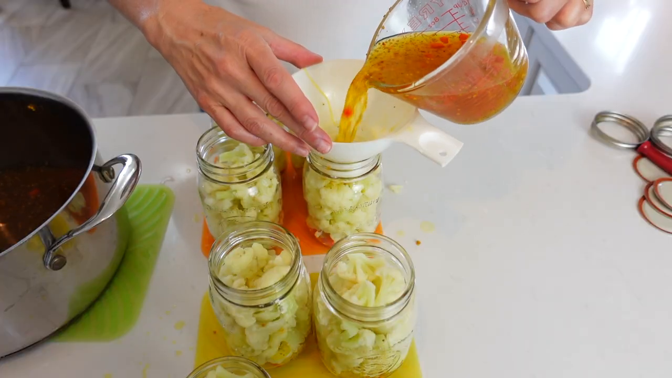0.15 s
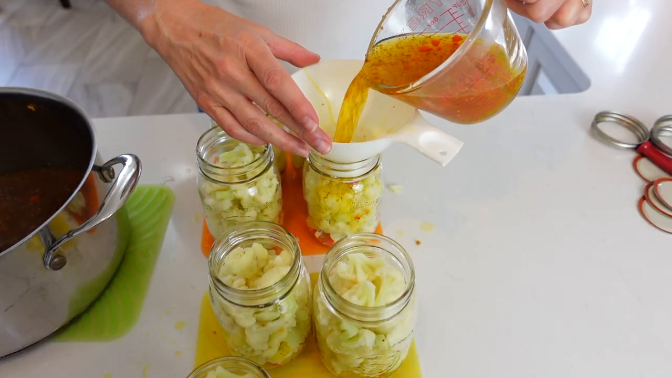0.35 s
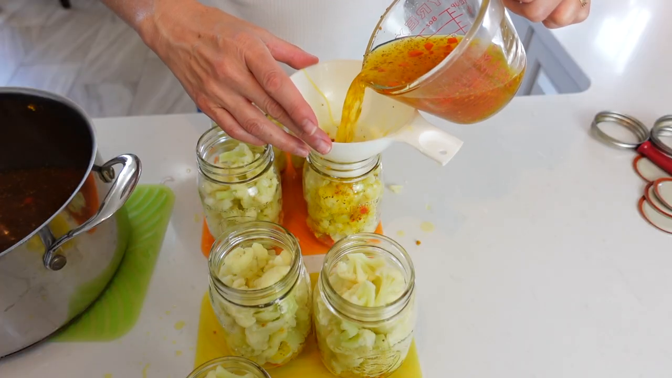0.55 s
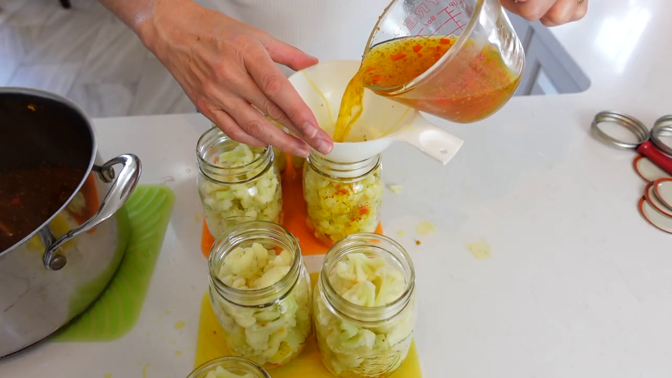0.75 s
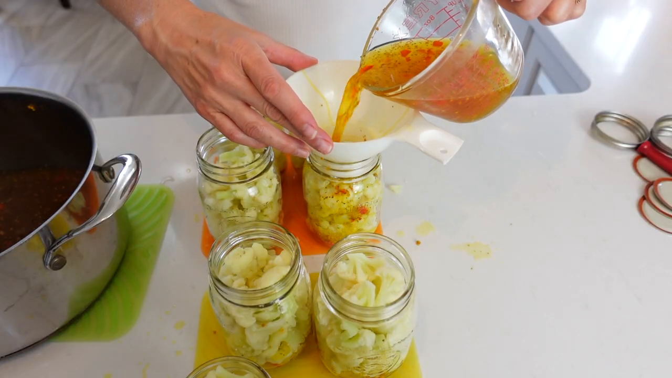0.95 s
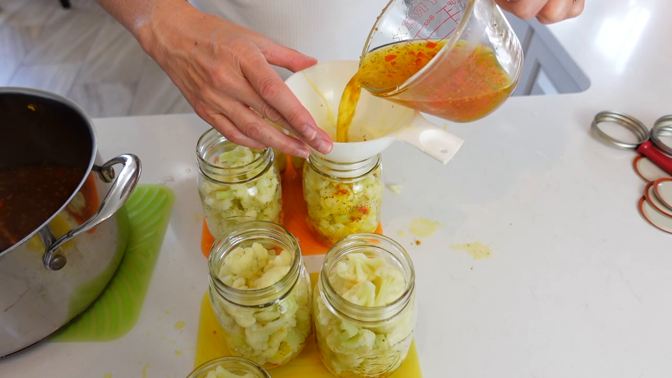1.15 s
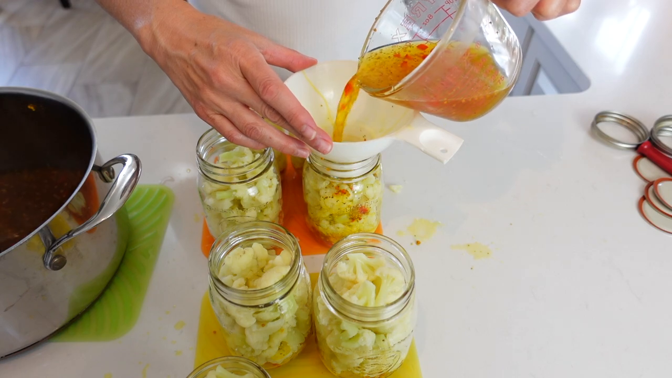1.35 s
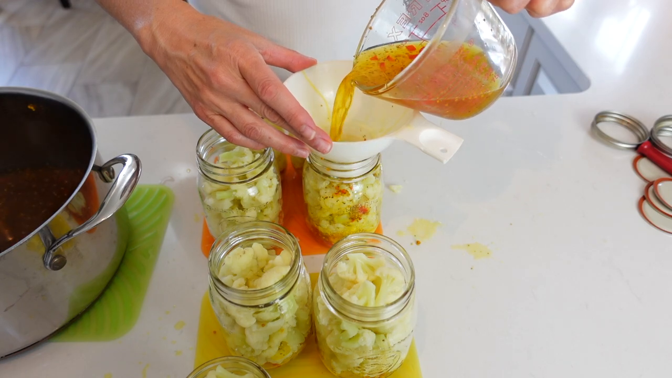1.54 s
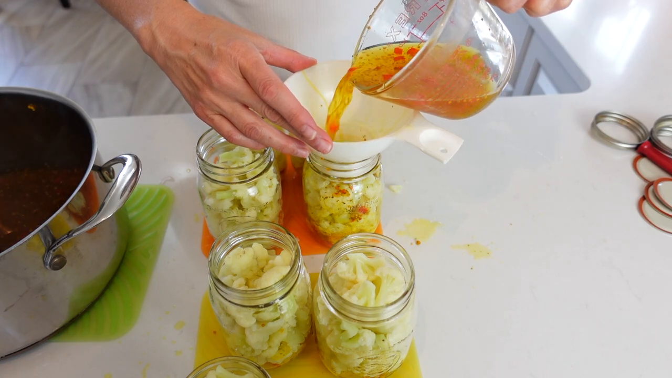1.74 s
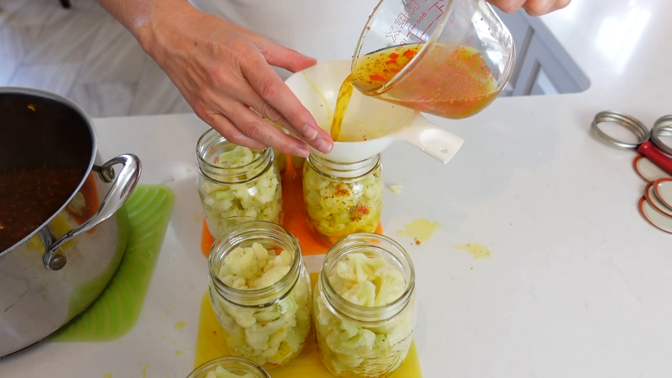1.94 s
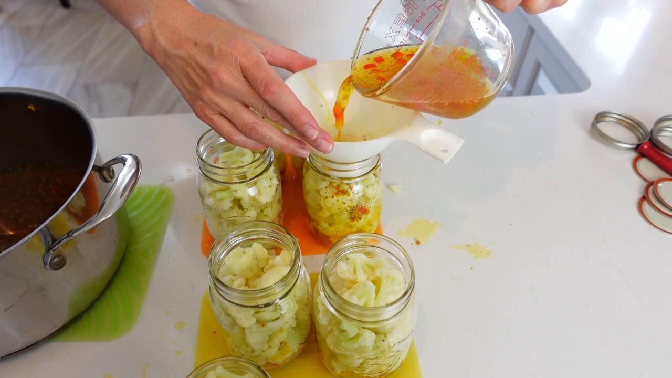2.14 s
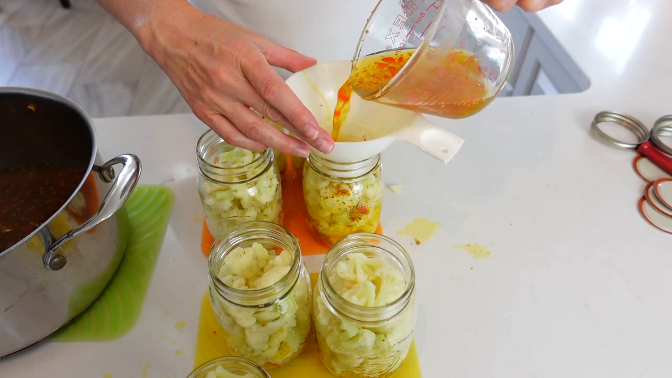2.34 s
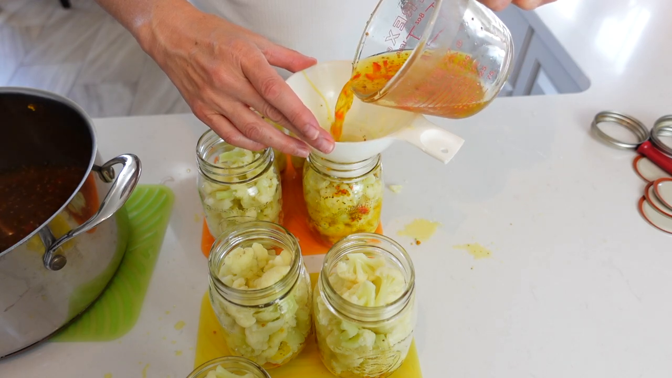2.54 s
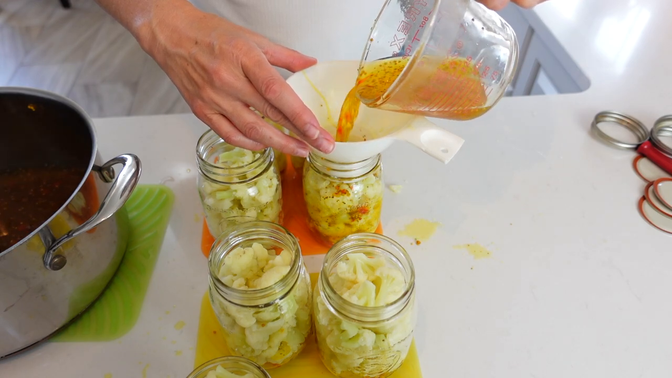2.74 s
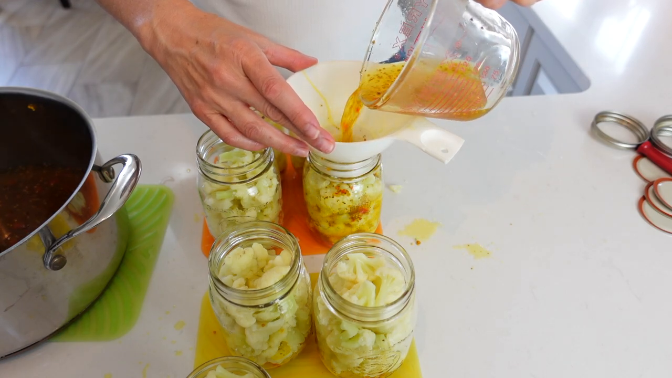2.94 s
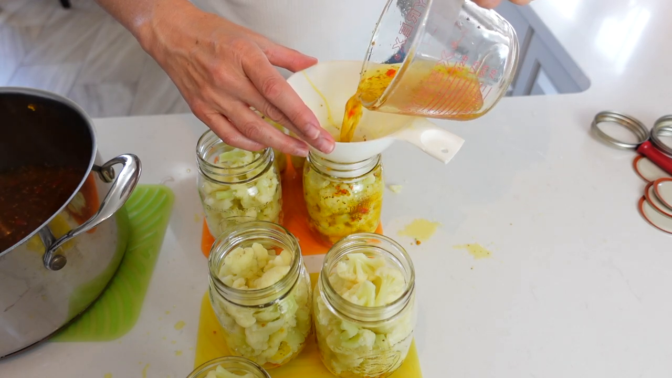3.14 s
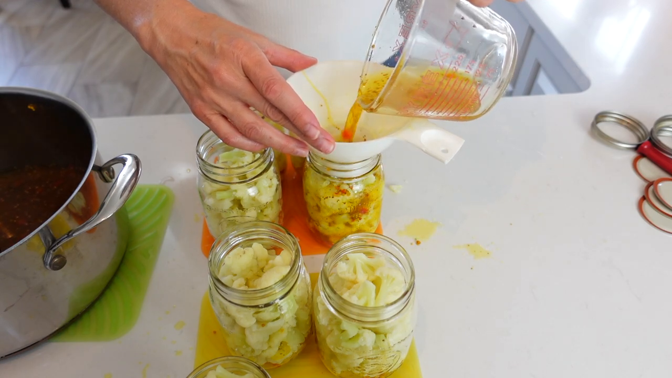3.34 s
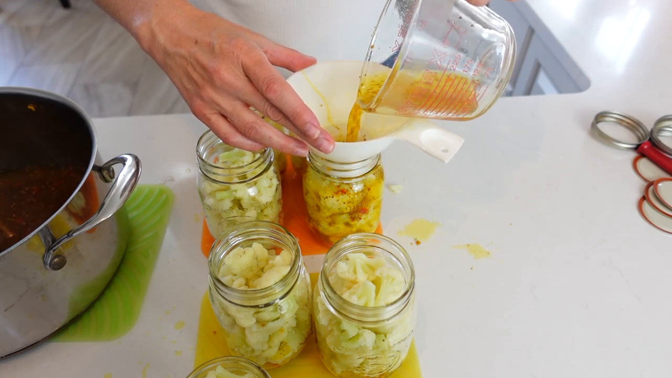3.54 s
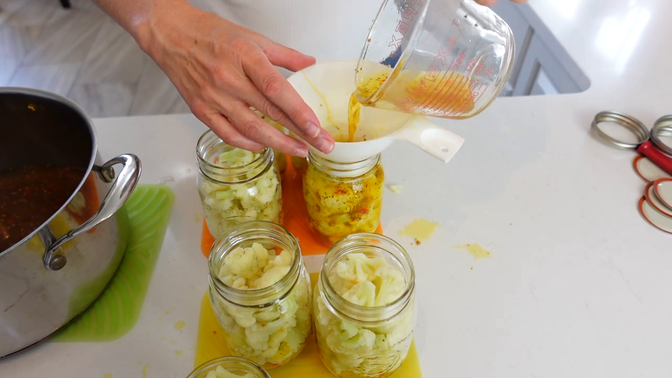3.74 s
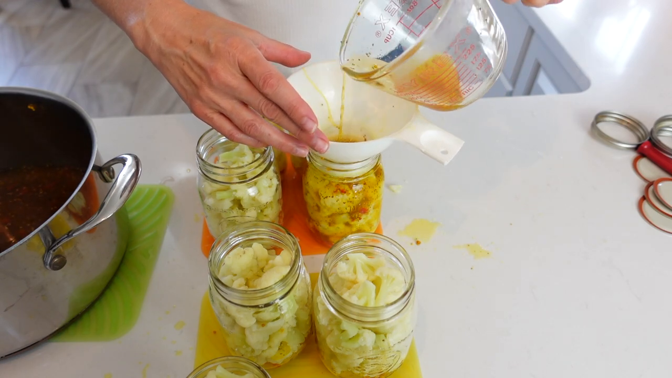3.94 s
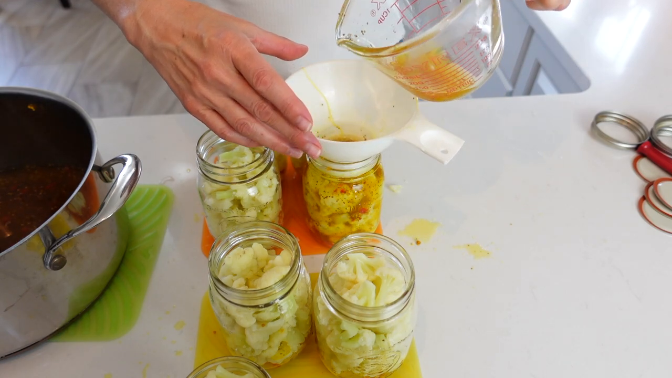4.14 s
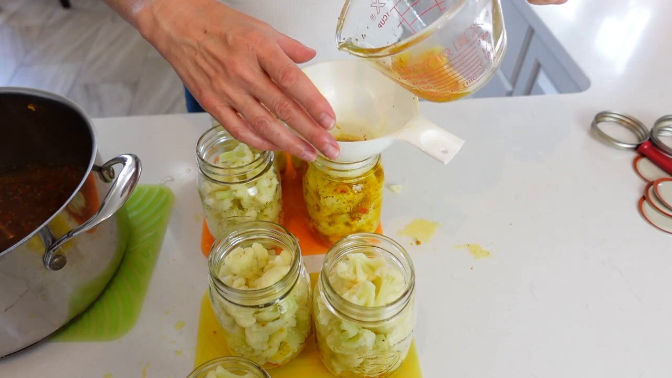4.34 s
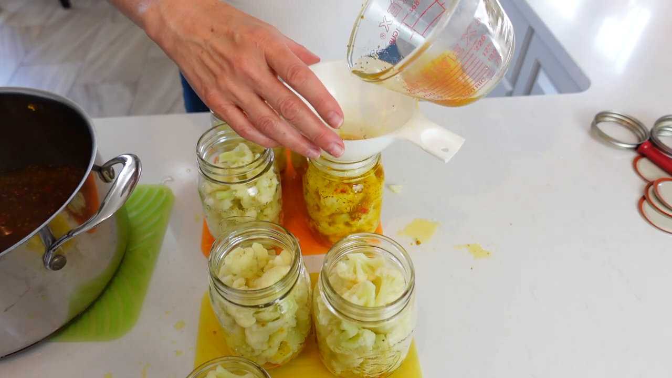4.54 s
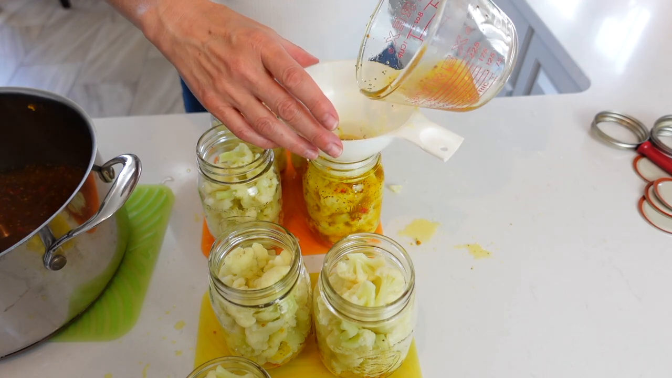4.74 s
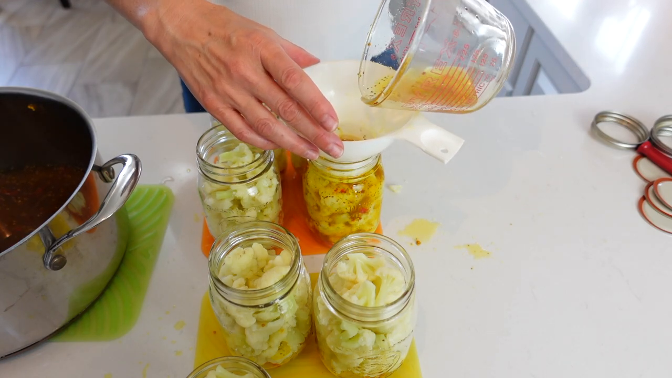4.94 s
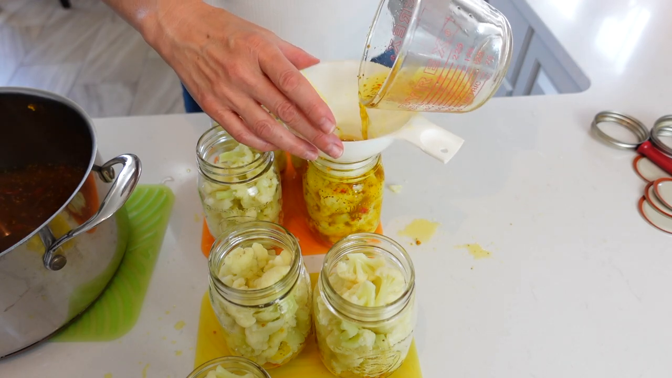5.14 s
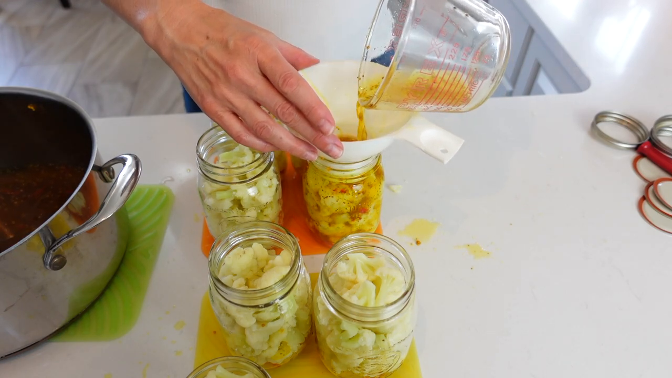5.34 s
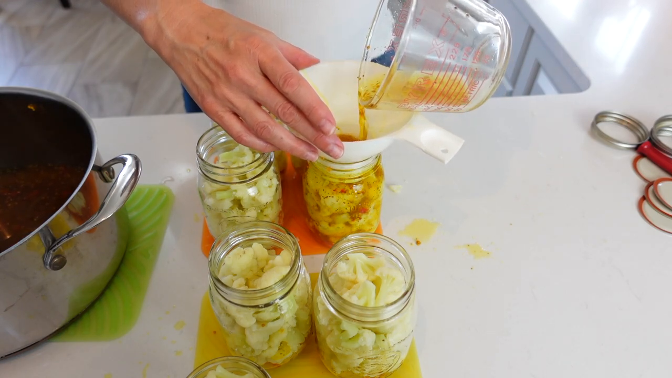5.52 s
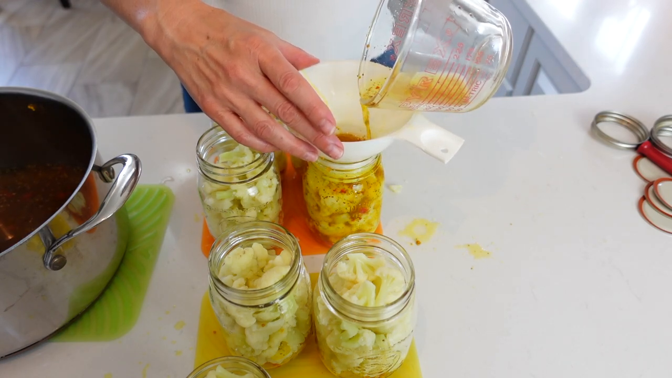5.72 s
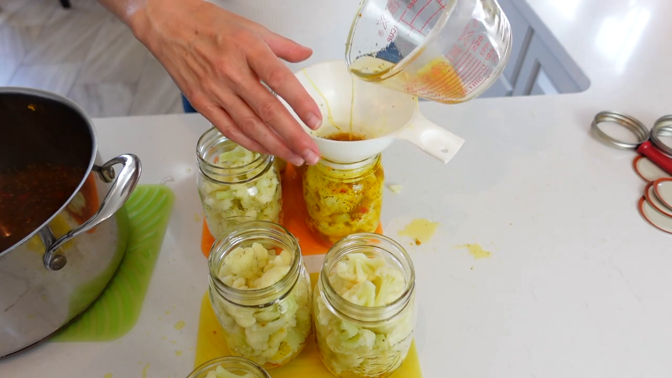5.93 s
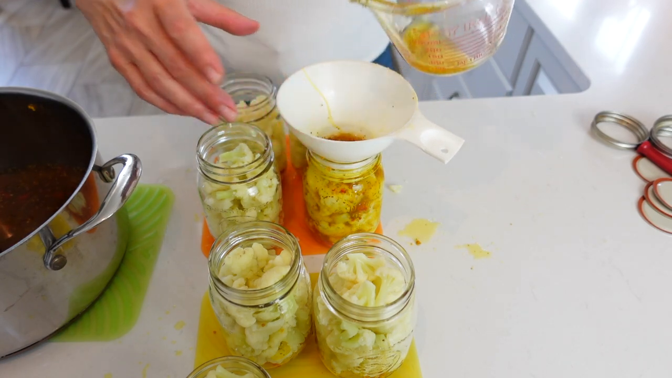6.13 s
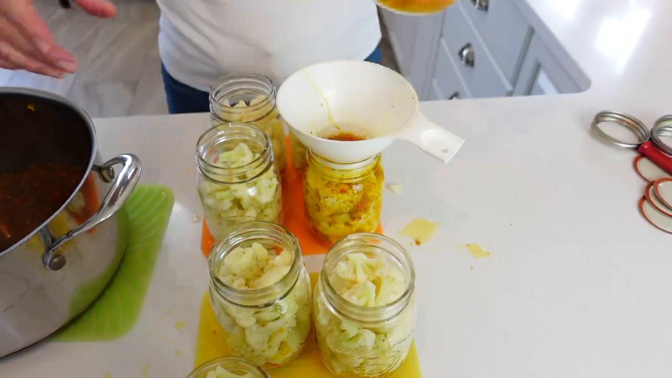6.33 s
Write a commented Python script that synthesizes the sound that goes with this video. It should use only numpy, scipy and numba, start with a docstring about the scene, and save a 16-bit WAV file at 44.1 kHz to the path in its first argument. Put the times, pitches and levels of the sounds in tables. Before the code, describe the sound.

A close stereo microphone catches a thin, bass-light stream splattering in a glass jar. Irregular clumps of drops click, plink and ring, strongest in the first second, with loose pops continuing to about four seconds. A quiet gap leaves room hiss and a barely audible high tone; then sparse drips, lower bubbles and a small burst follow. A tiny complete dropout comes just before the last splash. Small, lightly reflective kitchen.

```python
"""In a quiet kitchen, brine is poured from a cup through a wide funnel into a jar packed with cut vegetables.
The uneven stream lands as drops that crack and trap bubbles, each a short fading tone; louder pops stand out.
The finest droplets are a flickering hiss, and air gulps in the jar are low bubbles. Jar and funnel ring along,
reflections follow, and room noise with a faint steady tone lies below.
Near the end the sound drops out for a moment and the pouring goes on."""
import sys
import numpy as np
from scipy import signal
from scipy.io import wavfile
from numba import njit

SR = 44100
rng = np.random.default_rng(int(sys.argv[2]) if len(sys.argv) > 2 else 0)


def materialize(psi):
    """Save the field psi as 16-bit PCM at rate SR to the path in sys.argv[1].

    A 1-D psi becomes a single channel; in a 2-D psi each row is a channel.
    """
    bounded = np.clip(np.atleast_2d(psi).T, -1, 1)
    quanta = np.round(bounded * 32767).astype(np.int16)
    wavfile.write(sys.argv[1], SR, quanta)


N = 285768

# Background noise of the room. Each row: pitch in Hz, relative level in dB per Hz.
ROOM_SPECTRUM = [(15, -77), (25, -46), (775, 1), (936, -2), (1370, -3), (3080, -8.5), (3430, -10),
                 (7310, -14.5), (16000, -23)]
ROOM_HISS_DB = -51   # overall level of the hiss
# How alike the room hiss is on the left and right. Each row: pitch in Hz, likeness as a share.
ROOM_LIKENESS = [(60, 0.11), (380, 0.62), (2380, 0.56), (15000, 0.81)]
WHINE_HZ, WHINE_DB = 4760, -68.5   # a faint steady tone in the room
KITCHEN_T60_S, WALL_CUT_HZ = 0.3, 17700   # echo tail: time to fall 60 dB; treble softens from here

# Ringing of the air and glass. Each row: pitch in Hz, width in Hz, level in dB against the sound that excites it.
JAR_RESONANCES = [(1113, 52, -1), (1774, 73, -2), (2744, 44, 0), (3800, 61, -2.5), (4190, 120, -9),
                  (4823, 150, -3), (5960, 120, -6.5), (7270, 730, -3.5)]
# Air gulps in the jar. Each row: start in seconds, peak level in dB, pitch in Hz, ring in cycles.
AIR_GULPS = [(5.858, -53, 314, 5.7), (6.299, -43.5, 485, 40)]

# Flow of the stream, as the base level of its bubbles. Each row: time in seconds, level in dB.
STREAM_FLOW = [(0, -61), (0.12, -56), (0.19, -49.5), (0.215, -42.5), (0.39, -40.5), (0.45, -43.5),
               (0.49, -39), (0.7, -41.5), (0.8, -47), (1.25, -44.5), (1.36, -50.5), (1.485, -56),
               (1.495, -47.5), (1.9, -44), (2.2, -49), (2.4, -43.5), (2.6, -44.5), (2.9, -44), (3.1, -49),
               (3.7, -50), (3.9, -51), (4.04, -48), (4.12, -56), (4.6, -62), (5.1, -62), (5.18, -53),
               (5.45, -55), (5.9, -52), (5.97, -52), (6.12, -57), (6.37, -61.5), (6.43, -40), (6.48, -44)]
# How full the jar sounds: it fills up to the short silence, then sounds nearly empty.
# Each row: time in seconds, share filled.
JAR_FILL = [(0.2, 0.17), (3.7, 0.54), (4.05, 0.74), (5.1, 0.81), (6.37, 0.84), (6.43, 0.099)]
# Pitch around which the gurgle bubbles gather. Each row: time in seconds, pitch in Hz.
GURGLE_PITCH = [(0, 4710), (1.3, 4600), (1.7, 3890), (2.1, 3900), (2.45, 3200), (2.65, 4300), (2.95, 4170),
                (3.1, 3250), (3.72, 2390), (3.95, 3180), (4.12, 4220), (5.15, 6300), (5.33, 6260),
                (5.37, 3200), (5.42, 2980), (5.44, 1180), (5.9, 1130), (5.94, 5000), (6.48, 4170)]
# Single loud pops. Each row: time in seconds, peak level in dB, pitch in Hz, ring in cycles.
LOUD_POPS = [(0.1352, -28, 11280, 20), (0.2096, -26, 6000, 30), (0.241, -16.5, 4470, 11.5),
             (0.2596, -19.5, 5300, 27), (0.2423, -29, 1700, 10), (0.2897, -34, 1800, 34),
             (0.327, -25.5, 1790, 20), (0.343, -17.5, 5100, 8.4), (0.3812, -18.5, 5330, 12),
             (0.3988, -24, 3790, 16), (0.4052, -25, 4770, 13), (0.419, -14.5, 4960, 27),
             (0.475, -24, 4740, 16), (0.477, -28, 3050, 19), (0.484, -22.5, 2900, 18),
             (0.4927, -18.5, 9820, 12), (0.4998, -19.5, 8300, 16), (0.506, -27, 2670, 17),
             (0.5054, -12.5, 4580, 21), (0.5484, -23, 5230, 39), (0.554, -24, 4080, 48),
             (0.5552, -16, 10500, 28), (0.5621, -23.5, 8440, 56), (0.583, -21.5, 4130, 19),
             (0.6123, -20, 9400, 22), (0.6128, -20, 2870, 15), (0.6635, -22.5, 4570, 11),
             (0.693, -21, 4380, 29), (0.806, -15.5, 12320, 18), (0.852, -25, 4390, 22),
             (0.9239, -23, 6900, 13), (0.9563, -19, 13610, 12), (1.048, -26, 11370, 18),
             (1.0545, -27, 7500, 16), (1.0796, -25.5, 6000, 37), (1.1406, -26, 4910, 34),
             (1.1747, -18, 9820, 15), (1.194, -24.5, 7700, 38), (1.207, -19.5, 4820, 33),
             (1.255, -18.5, 11600, 7.5), (1.2916, -21.5, 4680, 7.4), (1.2949, -21, 11000, 14),
             (1.368, -27, 5430, 19), (1.4938, -28.5, 3870, 49), (1.5068, -26.5, 11000, 38),
             (1.5576, -26, 7100, 11), (1.6295, -22.5, 7600, 19), (1.634, -19, 12700, 18),
             (1.683, -27.5, 5250, 21), (1.7084, -20.5, 4400, 5.9), (1.7412, -22, 2840, 17),
             (1.7983, -27, 3630, 9.8), (1.8522, -23, 3590, 34), (1.8654, -22.5, 8350, 8.8),
             (1.9236, -25, 3530, 12), (1.95, -29, 5770, 30), (1.9816, -26.5, 7250, 14),
             (2.018, -30, 3360, 22), (2.066, -30.5, 4070, 18), (2.1331, -32, 6700, 33),
             (2.1562, -30, 2860, 29), (2.264, -28.5, 7700, 19), (2.2928, -23.5, 4230, 15),
             (2.2967, -24.5, 4260, 24), (2.376, -19, 4800, 8), (2.3876, -26, 4800, 17),
             (2.4036, -25, 2760, 33), (2.4157, -21, 3600, 16), (2.4242, -20, 1960, 10),
             (2.4325, -23.5, 3100, 14), (2.463, -27, 6030, 15), (2.4763, -21, 9500, 26),
             (2.5039, -25.5, 2770, 17), (2.5749, -24.5, 4050, 18), (2.565, -29, 3080, 30),
             (2.5819, -27, 3300, 10), (2.6366, -24, 9400, 17), (2.637, -19.5, 4420, 15),
             (2.7004, -24.5, 5160, 15), (2.7064, -23, 8860, 13), (2.75, -22.5, 10300, 33),
             (2.7973, -26, 2760, 35), (2.8055, -20.5, 4100, 15), (2.849, -21, 6140, 14),
             (2.8654, -27.5, 3170, 36), (2.8848, -17, 8600, 11), (2.9026, -20, 8400, 15),
             (2.9028, -25, 4770, 27), (2.9083, -25, 11800, 30), (2.9152, -19, 6640, 8.7),
             (2.927, -18.5, 10800, 15), (2.9729, -29.5, 4350, 31), (3.0068, -22, 4390, 13),
             (3.076, -25, 7240, 10), (3.1886, -30.5, 9500, 40), (3.198, -32, 1980, 15),
             (3.2306, -31, 5870, 49), (3.2744, -27, 4560, 12), (3.303, -25, 2170, 28),
             (3.304, -22.5, 3120, 16), (3.412, -22.5, 2010, 8.6), (3.4774, -17.5, 9760, 27),
             (3.478, -23, 13500, 25), (3.486, -25, 8050, 27), (3.505, -27, 3760, 32),
             (3.6501, -26.5, 9700, 40), (3.6828, -28, 7240, 26), (3.7112, -31.5, 6000, 30),
             (3.7626, -35, 8500, 30), (3.7914, -22.5, 2920, 14), (3.916, -32, 3000, 8),
             (3.961, -37, 7320, 11), (3.994, -26, 3620, 16), (4.0077, -26.5, 2996, 41),
             (4.034, -26, 2540, 17), (4.036, -16.5, 4200, 19), (4.0593, -32, 2930, 16),
             (4.1519, -32, 14380, 36), (4.6582, -36, 7150, 18), (5.1693, -38, 8960, 50),
             (5.2, -35, 5000, 8), (5.2076, -35, 6300, 33), (5.229, -33.5, 6300, 45), (5.24, -35, 7000, 11),
             (5.2975, -36.5, 6370, 40), (5.349, -35, 6440, 14), (5.3736, -26, 3250, 12),
             (5.38, -31.5, 3150, 42), (5.3935, -34.5, 9300, 15), (5.406, -36, 6800, 14),
             (5.517, -35.5, 6900, 12), (5.5154, -31, 13880, 18), (5.565, -37.5, 1170, 12),
             (5.5892, -29, 2850, 7.6), (5.667, -34.5, 1920, 7.2), (5.695, -36, 1810, 10),
             (5.7165, -30, 11200, 12), (5.7405, -33.5, 1220, 13), (5.768, -38, 7100, 15),
             (5.78, -37, 7000, 12), (5.8199, -30, 1155, 24), (5.8804, -33, 3880, 39),
             (5.871, -29.5, 2940, 50), (5.915, -27.5, 1990, 19), (5.9463, -25, 6230, 14),
             (5.9497, -19, 7200, 8.5), (5.9553, -26.5, 4940, 61), (5.9632, -30, 5000, 40),
             (6.0962, -27.5, 5270, 13), (6.0963, -26, 2700, 10), (6.4356, -25.5, 4000, 27),
             (6.448, -26.5, 5230, 24), (6.4545, -25.5, 5330, 11)]

# Bubble sizes. The entries: pitch in Hz of a large bubble, a small bubble and a spray droplet.
BUBBLE_SIZE_HZ = [1990, 4950, 9900]
# Their levels over an empty jar. The entries: large, small and spray, each in dB against the flow.
EMPTY_JAR_DB = [-7, -1, 1]
# The same over a full jar: a short fall makes larger bubbles and less spray. The entries: as above, in dB.
FULL_JAR_DB = [-1.5, -2, -6]
# Gurgle bubbles against the others. The entries: extra level in dB with the jar empty, then full.
GURGLE_BOOST_DB = [0, 7]
MIST_DB, MIST_LOW_HZ = -8.5, 4860   # fine droplets: level against the flow; lower edge
FULL_JAR_LOSS_DB = -9   # change of mist and stream cracks over a full jar
POUR_LOW_HZ = 444   # the pour is thin below this

# A short silence near the end. The entries: start of silence in seconds, return of sound in seconds.
DROPOUT_S = (6.372, 6.429)
TOP_CUT_HZ = 16500


def from_db(db):
    """Turn decibels into gain."""
    return 10 ** (np.asarray(db) / 20)


def rms_one(x):
    """Scale a sound so that its average strength (rms) is 1."""
    return x / np.sqrt(np.mean(x ** 2) + 1e-20)


def at_time(table, s):
    """Read a table of times and values, with straight lines between its rows."""
    return np.interp(s, *np.transpose(table))


def at_hz(table, hz):
    """Read a table of pitches and values, with pitch on a log axis."""
    table_hz, values = np.transpose(table)
    return np.interp(np.log(hz), np.log(table_hz), values)


def drift(rate_hz):
    """Make a slow random wander of spread 1 by smoothing noise; a higher rate wanders faster."""
    step = 40   # computed at every 40th sample, then joined by straight lines
    r = np.exp(-2 * np.pi * step * rate_hz / SR)
    slow = signal.lfilter([1], [1, -2 * r, r * r], rng.standard_normal(N // step + 2002))
    slow = rms_one(slow[2000:])   # skip the filter's start
    return np.interp(np.arange(N) / step, np.arange(len(slow)), slow)


def room_hiss(patchy_db=1.07):
    """Half-octave bands of stereo noise, each with its own level, slow sway and likeness, plus a faint tone."""
    hiss = 0
    shared_sway = drift(3)
    edges = 25 * 2 ** np.arange(0, 9.6, .5)
    white = rng.standard_normal((2, 2, N))   # two stereo noises, used for alternate bands
    for k, (low, high) in enumerate(zip(edges, edges[1:])):
        band = signal.butter(2, [low, high], "band", fs=SR, output="sos")
        mid, side = signal.sosfilt(band, white[k % 2])
        centre_hz = np.sqrt(low * high)
        alike = np.clip(at_hz(ROOM_LIKENESS, centre_hz), -1, 1)
        sway_db = patchy_db * (0.43 * shared_sway + drift(10.3))
        gain = from_db(at_hz(ROOM_SPECTRUM, centre_hz) + sway_db)
        # the side part has opposite signs on the left and right
        hiss = hiss + gain * (np.sqrt(1 + alike) * mid + np.sqrt(1 - alike) * side * [[1], [-1]])
    tone = from_db(WHINE_DB) * np.sin(2 * np.pi * WHINE_HZ * np.arange(N) / SR)
    return from_db(ROOM_HISS_DB) * rms_one(hiss) + tone


def kitchen(x, early_db=4.0, early_s=0.0049):
    """Reflections off counter and funnel crowd the first milliseconds, then a tail; two unrelated echoes."""
    t = np.arange(SR // 2) / SR
    tail = from_db(-60 * t / KITCHEN_T60_S)
    early = from_db(early_db) * np.exp(-t / early_s)
    onset = np.minimum(t / 0.0012, 1)
    echo = rng.standard_normal((2, len(t))) * (tail + early) * onset
    echo = signal.lfilter(*signal.butter(1, WALL_CUT_HZ, fs=SR), echo)
    echo = echo / np.sqrt(np.sum(echo ** 2) / 2)
    return signal.fftconvolve(x[None], echo, axes=1)[:, :N]


def jar(x):
    """Jar and funnel ring along: each resonance answers strongest at its pitch; a narrow one rings longer."""
    out = x.copy()
    for hz, width_hz, level_db in JAR_RESONANCES:
        r = np.exp(-np.pi * width_hz / SR)
        b = np.array([1, 0, -1]) * (1 - r * r) / 2
        a = [1, -2 * r * np.cos(2 * np.pi * hz / SR), r * r]
        out += from_db(level_db) * signal.lfilter(b, a, x + 1e-18)
    return out


@njit
def add_bubbles(out, at, size, hz, cycles, rise, swell, sr):
    """Each bubble swells, dies 60 dB in its cycles and rises in pitch as it nears the surface."""
    for i in range(len(at)):
        phase = 0.
        for n in range(min(int(cycles[i] * sr / hz[i]), len(out) - at[i])):
            turns = n * hz[i] / sr   # cycles since the start
            phase += 2 * np.pi * min(hz[i] * (1 + rise[i] * turns), .45 * sr) / sr
            envelope = (1 - np.exp(-turns / swell)) * 10 ** (-3 * turns / cycles[i])
            out[at[i] + n] += size[i] * envelope * np.sin(phase)


def bubbles(at, level_db, hz, cycles, rise=0.0033, swell=1.22):
    """Trapped air rings at a pitch; rise is the average pitch gain per cycle, swell is in cycles."""
    cycles, swell = np.clip(cycles, 2, 90), max(swell, .05)
    fall = 3 * np.log(10) * swell / cycles
    top = (fall / (1 + fall)) ** fall / (1 + fall)   # height of the swell-and-decay envelope
    rises = rise * rng.exponential(1, len(at))
    out = np.zeros(N)
    add_bubbles(out, at, from_db(level_db) / top, hz, cycles, rises, swell, float(SR))
    return out


def cracks(at, level_db):
    """The surface tears in short broad bursts of noise that fall 60 dB in 6.8 ms."""
    clicks = np.zeros(N)
    clicks[at] = from_db(level_db)
    envelope = signal.lfilter([1], [1, -from_db(-60 / (0.0068 * SR))], clicks + 1e-18)
    burst = envelope * rng.standard_normal(N)
    return signal.sosfilt(signal.butter(2, [900, 14000], "band", fs=SR, output="sos"), burst)


def glugs():
    """Large pockets of air escape between the vegetables as low, slowly swelling bubbles."""
    s, peak_db, hz, cycles = np.transpose(AIR_GULPS)
    return bubbles((s * SR).astype(int), peak_db, hz, cycles, rise=0.0011, swell=2.1)


def mist():
    """The finest droplets merge into a flickering hiss that follows the flow."""
    t = np.arange(N) / SR
    level_db = at_time(STREAM_FLOW, t) + MIST_DB + FULL_JAR_LOSS_DB * at_time(JAR_FILL, t)
    high = signal.butter(2, MIST_LOW_HZ, "high", fs=SR, output="sos")
    hiss = signal.sosfilt(high, rng.standard_normal(N))
    hiss = signal.lfilter([1], [1, -.6], hiss)   # soften the treble
    return from_db(level_db + 2.8 * drift(40)) * rms_one(hiss)


def pops():
    """Each loud pop is a ringing bubble and a crack, both begun a third of a cycle before its listed time."""
    s, peak_db, hz, cycles = np.transpose(LOUD_POPS)
    at = ((s - 0.32 / hz) * SR).astype(int)
    return bubbles(at, peak_db, hz, cycles, rise=0.0029, swell=0.78) + cracks(at, peak_db - 14.0)


def stream(drops_per_s=300, crack_db=-2):
    """Drops land in random clumps; each cracks and traps three bubbles at once, one near the gurgle's pitch."""
    flow_db = at_time(STREAM_FLOW, np.arange(N) / SR)
    thinned_db = .5 * np.clip(flow_db + 48, -20, 0)   # a thin trickle breaks into fewer drops
    per_s = drops_per_s * from_db(thinned_db + 4.0 * drift(25))   # the drift makes the clumps
    landed = np.flatnonzero(rng.random(N) < per_s / SR)
    force_db = 3.98 * np.minimum(rng.exponential(1, len(landed)), 2.6)   # a few drops hit much harder
    crack_level_db = flow_db[landed] + force_db + crack_db
    crack_level_db = crack_level_db + FULL_JAR_LOSS_DB * at_time(JAR_FILL, landed / SR)
    impacts = cracks(landed, crack_level_db)

    at, force_db = np.repeat(landed, 3), np.repeat(force_db, 3)
    hz = np.exp(rng.uniform(np.log(950), np.log(15500), len(at)))
    # every third bubble belongs to the gurgle
    hz[::3] = at_time(GURGLE_PITCH, landed / SR) * np.exp(0.098 * rng.standard_normal(len(landed)))

    fill = at_time(JAR_FILL, at / SR)
    empty_db = np.interp(np.log(hz), np.log(BUBBLE_SIZE_HZ), EMPTY_JAR_DB)
    full_db = np.interp(np.log(hz), np.log(BUBBLE_SIZE_HZ), FULL_JAR_DB)
    level_db = flow_db[at] + (1 - fill) * empty_db + fill * full_db
    level_db = level_db + 4.0 * np.log2(np.minimum(hz / BUBBLE_SIZE_HZ[0], 1))   # the largest bubbles are faint
    level_db = level_db + force_db + rng.normal(0, 2.66, len(at))
    level_db[::3] += np.interp(fill[::3], [0, 1], GURGLE_BOOST_DB)
    cycles = 3.0 + 2.89 * np.sqrt(hz / 100) * rng.exponential(1, len(at))
    return bubbles(at, level_db, hz, cycles) + impacts


def scene():
    """The pour near the middle, its reflections and the room."""
    thin = signal.butter(2, POUR_LOW_HZ, "high", fs=SR, output="sos")   # small sources radiate little bass
    splashes = jar(stream() + pops() + mist())
    pour = signal.sosfilt(thin, splashes) + glugs()
    alike, apart = kitchen(pour)   # the pour is close: most reflections reach both sides alike
    reflections = from_db(-7.5) * alike + from_db(-18) * apart * [[1], [-1]]
    direct = pour * from_db([[-.2], [.2]])   # slightly stronger on the right
    return direct + reflections + room_hiss()


def record(dry):
    """The top is cut by a steep filter, and the sound fades out and back in around the short silence."""
    t = np.arange(N) / SR
    gone, back = DROPOUT_S
    on = np.clip(np.maximum((gone - t) / 0.0029, (t - back) / 0.012), 0, 1)
    top_cut = signal.cheby2(14, 70, TOP_CUT_HZ, fs=SR, output="sos")
    return signal.sosfilt(top_cut, dry) * on


dry = scene()
out = record(dry)
materialize(out)
```